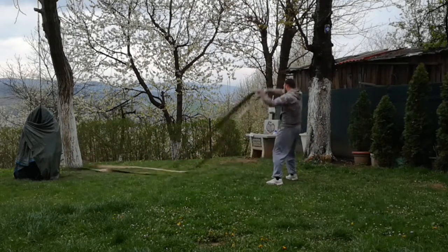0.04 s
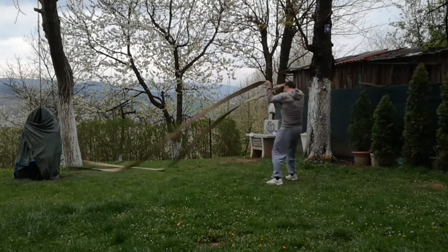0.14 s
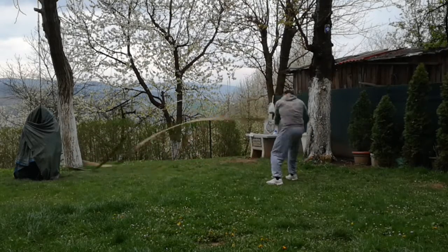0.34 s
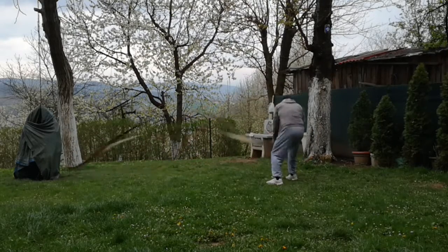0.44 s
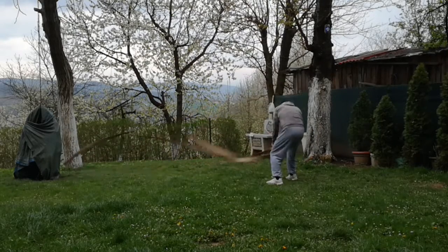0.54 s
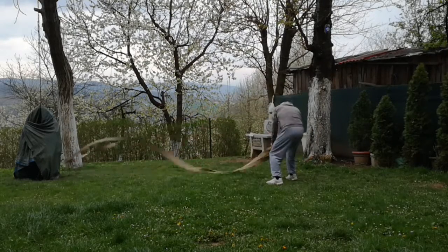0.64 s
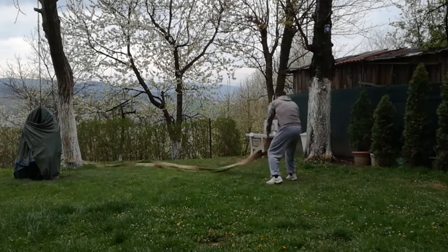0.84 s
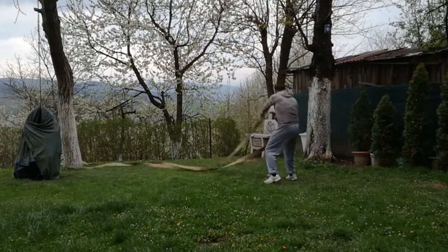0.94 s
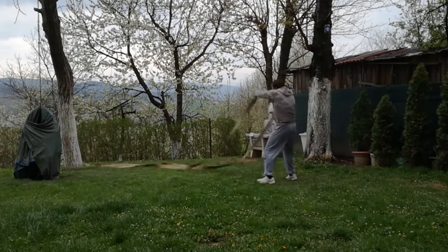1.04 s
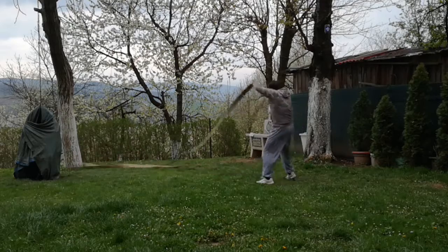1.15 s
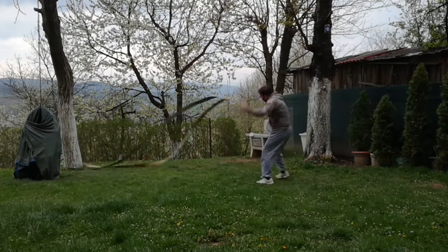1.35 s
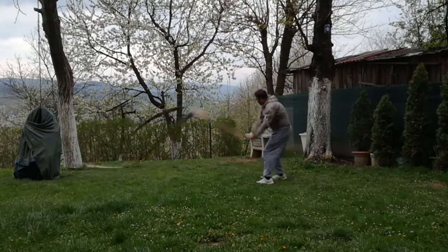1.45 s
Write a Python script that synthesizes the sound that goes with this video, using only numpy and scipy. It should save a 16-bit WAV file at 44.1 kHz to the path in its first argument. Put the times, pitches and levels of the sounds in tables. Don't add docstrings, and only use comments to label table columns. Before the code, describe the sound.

A heavy hose slaps onto grass in a quiet garden. Low engine hum, light wind and leaf hiss come first, with a faint airy swish around 0.4-0.5 s. At 0.55 s it touches down, cracking sharply at 0.57 s into a dense rush of slaps and turf thuds. The loose end slaps weakly near 0.75 s; small thuds end by 0.9 s, leaving a diffuse echo, faint swishes and fading wind.

```python
import sys
import numpy as np
from scipy import signal
from scipy.fft import rfft, irfft
from scipy.io import wavfile
from scipy.ndimage import uniform_filter1d

SR = 44100
rng = np.random.default_rng(int(sys.argv[2]) if len(sys.argv) > 2 else 0)


def attenuation_scalar(level_db):
    decades = np.asarray(level_db, float) / 20
    return 10 ** decades


def to_wav(s):
    ch = np.atleast_2d(s).T
    pcm = np.round(np.clip(ch, -1, 1) * 32767)
    wavfile.write(sys.argv[1], SR, pcm.astype(np.int16))


N = 66150
T = np.arange(N) / SR


def unit(x):
    return x / np.sqrt(np.mean(x ** 2))


def noise():
    return rng.standard_normal(N)


def butter(x, order, hz, kind="low"):
    return signal.sosfilt(signal.butter(order, hz, kind, fs=SR, output="sos"), x)


def curve(table, axis):
    rows = np.array(table)
    return np.interp(T, rows[:, 0], rows[:, axis])


def colour(x, table, share=1):
    rows = np.array(table)
    hz = np.fft.rfftfreq(N, 1 / SR)
    db = share * np.interp(np.log(hz + 1), np.log(rows[:, 0]), rows[:, 1])
    cepstrum = irfft(np.log(attenuation_scalar(db)), N)
    cepstrum[1:N // 2] *= 2
    cepstrum[N // 2 + 1:] = 0
    return irfft(rfft(x) * np.exp(rfft(cepstrum)), N)


def ring(x, hz, t60_s):
    pole = np.exp((2j * np.pi * hz - np.log(1000) / t60_s) / SR)
    return signal.lfilter([1], [1, -pole], x).imag


def ring_modes(x, modes):
    return sum(attenuation_scalar(db) * unit(ring(x, hz, t60_s)) for hz, db, t60_s in modes)


def bump(centre_s, length_s):
    return np.exp(-(2 * (T - centre_s) / length_s) ** 2)


def walk(rate_hz):
    k = int(SR / rate_hz)
    steps = np.repeat(rng.standard_normal(N // k + 1), k)
    return unit(uniform_filter1d(uniform_filter1d(steps, k), k)[:N])


def grains(per_s, scatter_db):
    hit = rng.random(N) < per_s / SR
    sign = np.sign(noise())
    size = np.minimum(rng.exponential(size=N), 1.7)
    return unit(hit * sign * attenuation_scalar(scatter_db * size))


# hz, side_db
SIDE_WIDTH = [(40, -50), (90, -19), (180, -17.5), (350, -4.5), (600, 4.5), (1200, 0), (2500, 0), (6000, 1)]


def ports(make):
    mid = make()
    side = colour(make(), SIDE_WIDTH)
    return np.array([mid + side, mid - side])


# hz, left_minus_right_db
BODY_SHADE = [(200, -4), (350, 2.5), (600, -3.5), (1300, 1.5), (2500, 0.5), (5000, -11.5), (9000, -6.5)]


def sideways(x):
    return np.array([colour(x[0], BODY_SHADE, share=1 / 2), colour(x[1], BODY_SHADE, share=-1 / 2)])


# time_s, slap_db, thud_db, brightness_db
LANDING = [
    (.550, -66, -62, -1),
    (.565, -54, -56, 6),
    (.569, -45.5, -46, 5),
    (.598, -44.5, -49, 5),
    (.675, -48, -46, 2.5),
    (.715, -54, -52.5, 2),
    (.765, -59.5, -56.5, 3.5),
    (.865, -72, -57, 1.5),
    (.885, -78.5, -74, 11.5),
]


def landing_gate():
    opening = np.clip((T - LANDING[0][0]) * 200, 0, 1)
    return opening * np.clip((LANDING[-1][0] - T) * 20 + 1, 0, 1)


# hz, density_db_per_hz
SLAP_COLOUR = [(250, -15.5), (480, -5.5), (650, -2.5), (1400, -5.5), (2500, -16.5), (5500, -33),
               (7200, -50), (9500, -68)]
# hz, level_db, t60_s
HOSE_MODES = [(634, -11.5, 0.14), (467, -15, 0.051), (748, -17.5, 0.15), (1006, -14.5, 0.12),
              (1396, -19, 0.047), (2460, -29, 0.079)]


def slap_rush():
    clumps = attenuation_scalar(1.23 * walk(220))
    slap_db, bright_db = curve(LANDING, axis=1), curve(LANDING, axis=3)

    def rush():
        contacts = clumps * grains(per_s=3500, scatter_db=4)
        x = unit(colour(contacts, SLAP_COLOUR))
        x = unit(x + ring_modes(contacts, HOSE_MODES))
        low = butter(x, 2, 1790)
        return attenuation_scalar(slap_db) * (low + attenuation_scalar(bright_db) * (x - low))
    return landing_gate() * sideways(ports(rush))


def blows(table, left_lag_s):
    right_lag_s, contact_s = 0.00019, 0.0001
    out = np.zeros((2, N))
    for start_s, level_db, hz, t60_s, pan_db in table:
        for port, sign, lag_s in ((0, 1, left_lag_s), (1, -1, right_lag_s)):
            t = np.maximum(T - start_s - lag_s, 0)
            envelope = attenuation_scalar(-60 * t / t60_s) * (1 - np.exp(-t / contact_s))
            out[port] -= attenuation_scalar(level_db + sign * pan_db / 2) * np.sin(2 * np.pi * hz * t) * envelope
    out[0] = butter(out[0], 3, 3470)
    return butter(out, 4, 7000)


HOSE_LEFT_LAG_S = 0.00014
# start_s, level_db, ring_hz, t60_s, left_minus_right_db
CRACKS = [(.5675, -21, 2100, 0.0017, -4), (.5700, -34.5, 647, 0.032, -8),
          (.5741, -20.5, 2450, 0.0038, -5.5), (.5752, -36, 1250, 0.015, 8), (.5762, -38.5, 2900, 0.0087, 2),
          (.5792, -31, 3200, .004, -6), (.5820, -29, 856, .012, -6), (.5855, -45, 4300, .0065, -11),
          (.5852, -52, 5900, 0.0078, -16), (.5855, -32, 1106, .012, 3), (.5915, -34, 2500, 0.0088, -2),
          (.5925, -31.5, 960, 0.0066, 0), (.5935, -38.5, 612, 0.11, -6), (.5948, -26, 1200, .009, -5),
          (.5966, -31, 1920, 0.0036, -8)]


def cracks():
    return blows(CRACKS, HOSE_LEFT_LAG_S)


# start_s, level_db, ring_hz, t60_s, left_minus_right_db
SLAPS = [(.6003, -31.5, 750, .007, -3), (0.6032, -34, 550, 0.0079, -7), (.6068, -32, 2200, .005, 0),
         (0.6099, -33.5, 1470, 0.0069, 0), (.612, -40.5, 655, 0.082, -5), (.6178, -36.5, 550, .008, -3),
         (.6255, -33, 594, 0.0074, 0), (0.6316, -32, 520, 0.0075, 0), (0.6361, -33, 1093, .014, 0),
         (0.6433, -33.5, 550, 0.0091, 2), (0.6534, -30, 800, 0.0073, 2), (.6545, -38, 2320, .004, -3),
         (.6665, -33.5, 500, .012, 2), (.672, -40, 1100, .008, 0), (.6828, -37, 420, .01, -3),
         (0.6913, -37.5, 403, .01, 0), (.6955, -39, 1010, 0.0055, 0), (.7005, -42, 600, 0.0087, 0),
         (0.7041, -44, 1480, 0.0034, 0)]


def single_slaps():
    return blows(SLAPS, HOSE_LEFT_LAG_S)


# start_s, level_db, ring_hz, t60_s, left_minus_right_db
LOOSE_END = [
    (0.7438, -47, 1300, .006, -1),
    (.7457, -38, 1400, .014, 1),
    (.7466, -41.5, 3330, 0.0077, -2),
    (.7472, -36, 1405, 0.0069, 1),
    (.7510, -45, 1200, .01, 3),
    (.7605, -46.5, 2000, .006, -2),
    (.787, -55, 3300, .006, -3),
    (.795, -52, 1800, .006, 0),
    (.808, -53, 1500, .006, 0),
]


def loose_end():
    return blows(LOOSE_END, HOSE_LEFT_LAG_S)


# hz, level_db, t60_s
TURF_MODES = [(107, -8, 0.068), (154, -1, 0.15), (207, -1.5, 0.061), (266.4, -1, 0.077)]


def turf_thuds():
    thud_db = curve(LANDING, axis=2)

    def thuds():
        contacts = grains(per_s=700, scatter_db=1)
        return unit(ring_modes(contacts, TURF_MODES)) * attenuation_scalar(thud_db)
    return landing_gate() * ports(thuds)


# start_s, level_db, ring_hz, t60_s, left_minus_right_db
KNOCKS = [(.550, -36.5, 160, 0.042, -0.5), (.5665, -34.5, 289, 0.068, 0.5), (.596, -40, 265, 0.092, 0),
          (.618, -37, 149.7, 0.14, -1.5), (.640, -42.5, 280, 0.05, 0), (.645, -43, 95, .1, 0),
          (.658, -36, 160.6, .12, 0), (.682, -41.5, 221, .06, 0), (.690, -41.5, 138.5, 0.084, 0),
          (.712, -43.5, 169, 0.042, 0), (.7378, -37.5, 216, 0.031, 0), (.7595, -43.5, 259, 0.018, 0),
          (.765, -49, 100, .1, 0), (.777, -47, 130, 0.044, -1), (.791, -47.5, 230, .03, 0),
          (.804, -48, 240, 0.026, 0), (.8135, -45, 210, 0.028, 1), (.8185, -42.5, 208, 0.044, -1),
          (.834, -45.5, 220, 0.042, 1), (.840, -50, 95, .1, 0), (.847, -47.5, 251, 0.056, 0),
          (.862, -50, 159, 0.038, 0)]


def turf_knocks():
    return blows(KNOCKS, left_lag_s=0)


def yard(hose):
    level_db, t60_s, gap_s = -18.5, 0.94, 0.012
    tail = ports(lambda: noise() * attenuation_scalar(-60 * T / t60_s) * (T > gap_s))
    tail = tail / np.sqrt(np.sum(tail[0] ** 2))
    return attenuation_scalar(level_db) * signal.fftconvolve(hose.mean(0)[None], tail, axes=1)[:, :N]


# centre_s, length_s, level_db, pitch_hz, width_hz
SWINGS = [(0.455, 0.061, -64.5, 680, 8.7), (0.524, 0.14, -65, 1186, 45), (0.451, 0.14, -71.5, 530, 320),
          (0.48, 0.4, -79.5, 2500, 1600), (0.32, 0.44, -72.5, 1310, 290), (1.035, 0.04, -67, 1150, 330),
          (0.78, 0.097, -80, 4900, 350), (1.02, 0.36, -85, 4400, 2400), (0.5, 0.28, -81.5, 2760, 720),
          (1.4, 0.039, -76.5, 1200, 240), (1.265, 0.036, -71, 1250, 300), (1.3, 0.094, -75.5, 1460, 300),
          (0.064, .08, -76.5, 390, 240)]


def swings():
    out = np.zeros((2, N))
    for centre_s, length_s, level_db, hz, width_hz in SWINGS:
        tone = ports(lambda: unit(ring(noise(), hz, 2.0 / width_hz)))
        out += attenuation_scalar(level_db) * bump(centre_s, length_s) * tone
    return out


# time_s, firing_db, overtones_db
ENGINE = [(0, -63.5, -80), (.08, -55.5, -82), (.135, -71, -72), (.19, -53, -70.5), (.3, -56.5, -67.5),
          (.4, -55, -65.5), (.49, -51.5, -73.5), (.55, -73, -63), (.7, -59.5, -75), (.86, -59, -79),
          (.89, -70, -70), (1.0, -72, -70), (1.06, -79, -64), (1.13, -57.5, -77.5), (1.19, -73, -68.5),
          (1.3, -76, -78), (1.4, -64, -74.5), (1.5, -77, -92)]
# multiple, level_db
OVERTONES = [(2, -6.5), (3, -4), (4, -6), (5, -13), (6, -23.5)]
# multiple, centre_s, length_s, lift_db
GUSTS = [
    (4, 0.26, 0.37, 13.5),
    (5, .31, 0.16, 11.5),
    (3, 0.39, 0.45, 9.5),
    (2, .47, 0.14, 17),
    (4, 1.043, 0.08, 7.5),
    (2, 1.1, 0.2, 7.5),
    (4, 1.26, 0.072, 6),
    (4, 1.106, 0.095, 2),
]


def engine():
    firing_hz, drift, flutter_db = 53.4, 0.00776, 2
    beat_hz, beat_peak_s, beat_db = 7.8, 0.078, 2.5
    phase = 2 * np.pi * np.cumsum(firing_hz * (1 + drift * walk(6))) / SR
    overtones = np.zeros(N)
    for k, level_db in OVERTONES:
        lift_db = sum(db * bump(s, length_s) for multiple, s, length_s, db in GUSTS if multiple == k)
        level = attenuation_scalar(level_db + lift_db + flutter_db * walk(14))
        overtones += level * np.sin(k * phase + 1.5 * walk(16))
    beat = beat_db * np.cos(2 * np.pi * beat_hz * (T - beat_peak_s))
    firing = np.sqrt(2) * attenuation_scalar(curve(ENGINE, axis=1) + beat) * np.sin(phase)
    return firing + attenuation_scalar(curve(ENGINE, axis=2) + 1.5) * overtones


# hz, density_db_per_hz
LEAF_COLOUR = [(250, -12), (450, -10.5), (950, -3.5), (1400, -2), (1800, -8), (4500, -20.5), (6500, -27.5),
               (9000, -53)]


def leaves():
    hiss = ports(lambda: unit(colour(noise(), LEAF_COLOUR)))
    return hiss * attenuation_scalar(-73.5 + 0.28 * walk(3.1) + 0.75 * walk(18.08))


# hz, density_db_per_hz
WIND_COLOUR = [(20, -2), (40, -3.5), (75, -5.5), (110, 5.5), (220, -2.5), (320, -6), (400, -20.5),
               (600, -46.5)]


def wind():
    level_db, fade_db_per_s, buffet_db, buffet_hz = -67.5, -1.5, 2.2, 25
    rumble = ports(lambda: unit(colour(noise(), WIND_COLOUR)))
    return rumble * attenuation_scalar(level_db + fade_db_per_s * T + buffet_db * walk(buffet_hz))


def ticks():
    start_s, gap_s, stray_s = 0.0643, 0.10236, 1.1578
    level_db, t60_s, pan_db = -69.5, 0.003, -3.5
    times_s = [start_s + gap_s * k for k in range(11) if k not in (5, 6)] + [stray_s]
    gate = sum((T > s) * attenuation_scalar(-60 * np.maximum(T - s, 0) / t60_s) for s in times_s)
    snap = butter(noise(), 2, 7500, "high")
    return snap * gate * attenuation_scalar(level_db + np.array([[1], [-1]]) * pan_db / 2)


# hz, density_db_per_hz
HISS_COLOUR = [(300, 2), (6000, 0.5), (10000, -4), (15000, 1)]


def amplifier_hiss():
    return attenuation_scalar(-86.5) * np.array([unit(colour(noise(), HISS_COLOUR)) for _ in range(2)])


def scene():
    hose = slap_rush() + cracks() + single_slaps() + loose_end() + turf_thuds() + turf_knocks()
    hose = butter(hose, 2, 75, "high")
    background = engine() + leaves() + wind() + ticks() + amplifier_hiss()
    return hose + yard(hose) + swings() + background


def band_limit(x):
    return signal.sosfilt(signal.butter(12, 15890, fs=SR, output="sos"), x)


def record(dry):
    mix = butter(dry, 2, 30, "high")
    return band_limit(mix)


dry = scene()
out = record(dry)
to_wav(out)
```